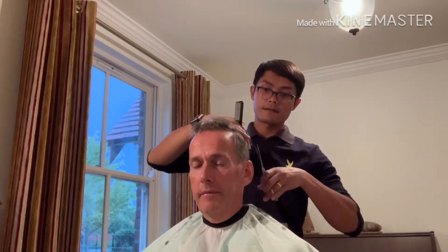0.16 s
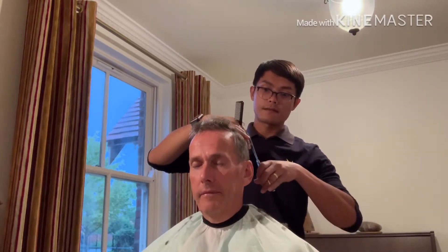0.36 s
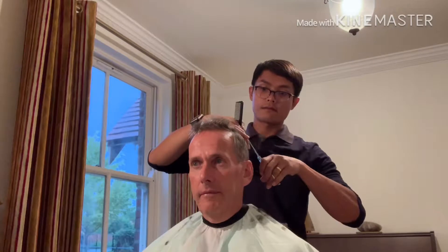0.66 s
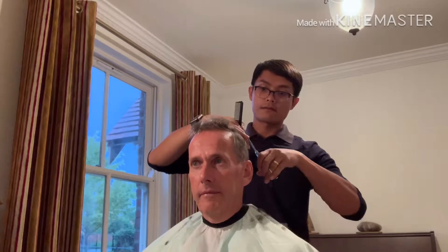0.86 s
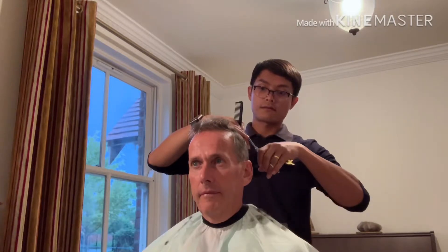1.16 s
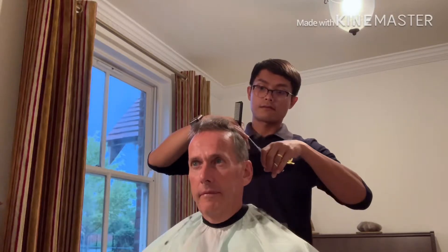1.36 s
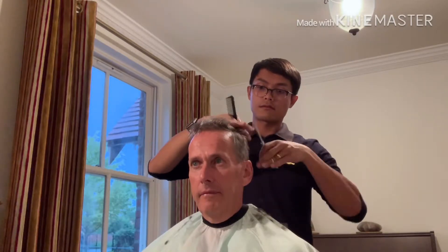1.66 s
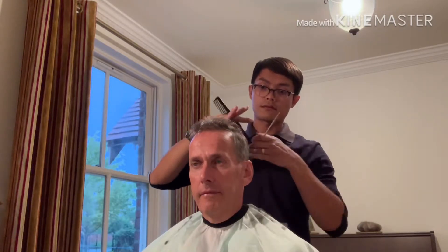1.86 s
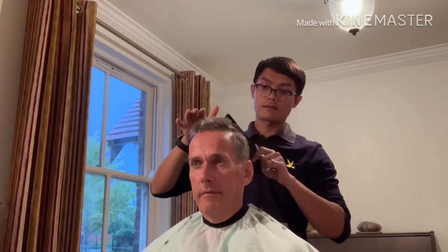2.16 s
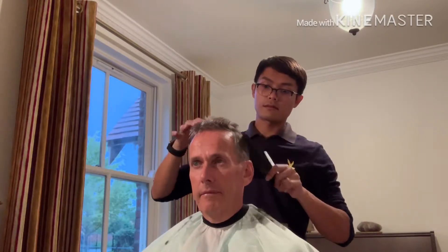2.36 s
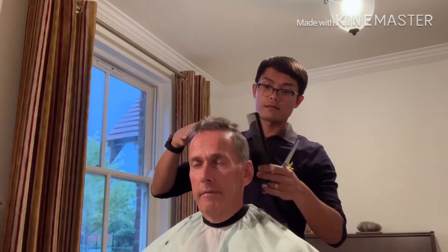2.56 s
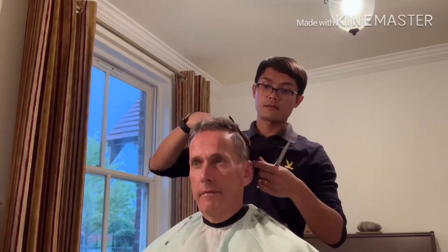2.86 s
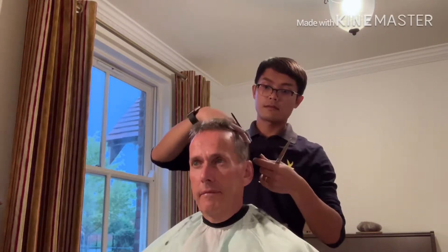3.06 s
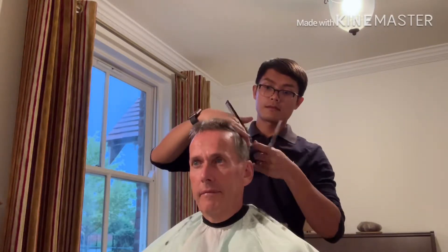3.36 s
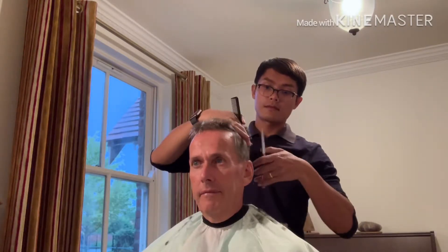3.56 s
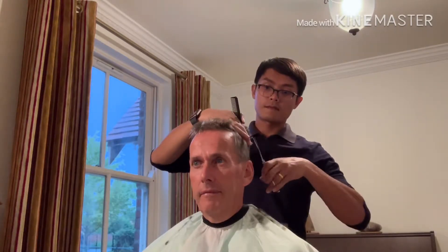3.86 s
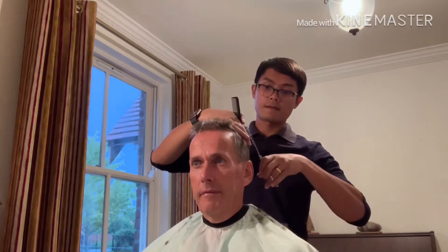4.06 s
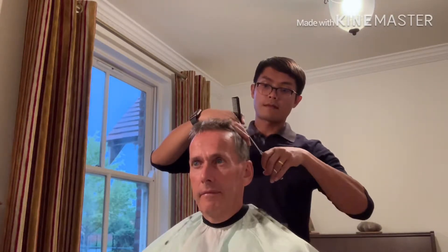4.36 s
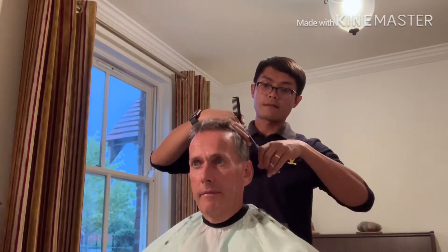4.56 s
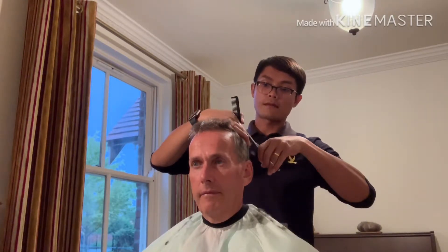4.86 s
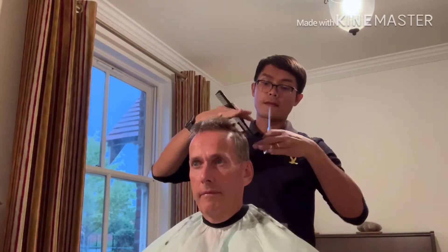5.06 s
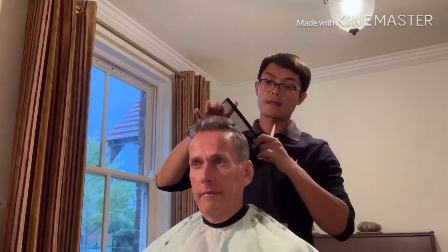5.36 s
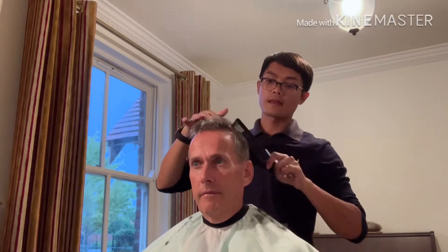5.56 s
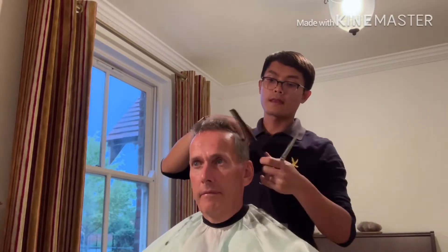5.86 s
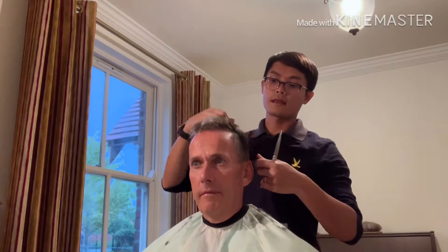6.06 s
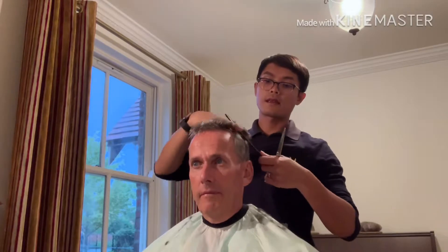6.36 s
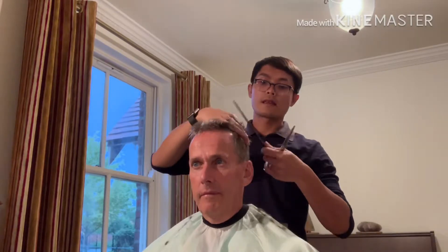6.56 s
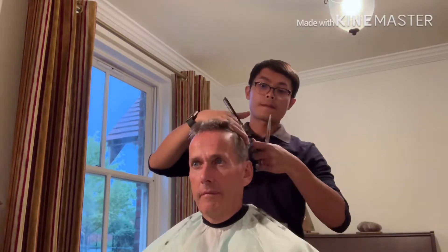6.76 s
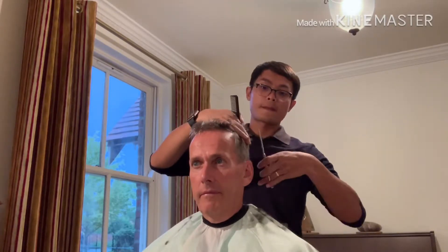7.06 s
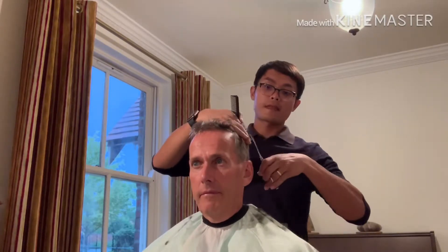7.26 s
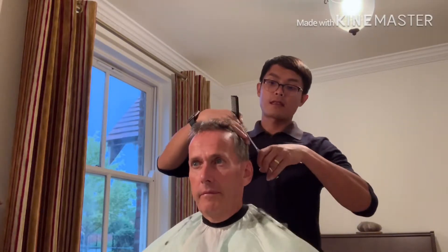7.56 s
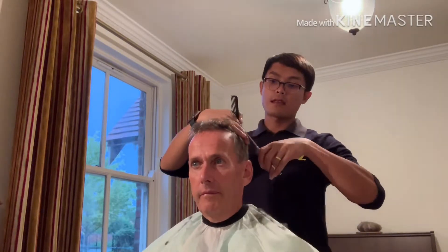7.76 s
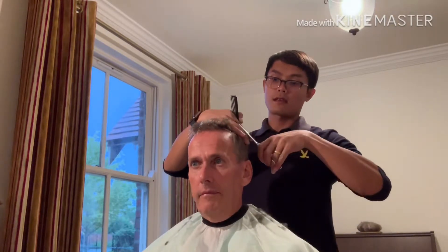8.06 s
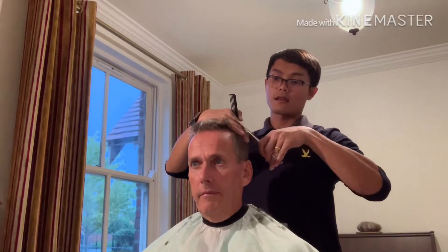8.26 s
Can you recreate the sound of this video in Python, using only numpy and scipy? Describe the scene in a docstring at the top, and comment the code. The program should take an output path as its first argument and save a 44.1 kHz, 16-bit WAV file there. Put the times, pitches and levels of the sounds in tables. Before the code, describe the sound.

A quiet room with short hard reflections, a low steady hum around 50 Hz, soft house rumble and faint hiss throughout. After a tiny tick at 0.1 s, scissors crunch through hair and click shut at about 0.65, 1.0, 1.3 and 1.6 s, thin, crisp and metallic. At 1.95-2.0 s comes a stronger cut with a quick bright double clack of steel and comb. A pause follows with faint ticks and a brief brush near 2.6 s, and a tiny tap at 3.8 s. Snips return at 4.4, 4.5, 4.7 and 4.9 s, then the loudest sharp steel clack at 5.27 s. Quiet ticks at 5.5 s, soft cloth rustle from 6.0 s, and a dull soft footfall on boards at 6.27 s, with fainter shifts at 6.8 and 7.2 s. A light tap at 7.24 s leads to final snips at 7.65, 8.0, 8.15 and 8.27 s.

```python
"""A quiet, hard-walled room: scissors crunch through hair and click shut, comb and steel tap.
Cuts are dense noise snaps, contacts and knocks are bursts through resonances, each with a room tail.
Cloth and comb drag as patchy gliding noise; a foot lands and shifts twice on ringing floor boards.
Mains hum (a wavering sine), house rumble and microphone hiss (shaped noise) lie underneath."""
import sys
import numpy as np
from scipy import signal
from scipy.fft import rfft, irfft, next_fast_len
from scipy.io import wavfile
from scipy.ndimage import uniform_filter1d, map_coordinates

SR = 44100
rng = np.random.default_rng(int(sys.argv[2]) if len(sys.argv) > 2 else 0)


def to_wav(sig):
    """Store sig (one row per channel, or 1-D mono) as 16-bit WAV at the path in sys.argv[1].

    Samples outside -1..1 are clipped; the rate is SR.
    """
    pcm = np.clip(np.atleast_2d(sig), -1, 1) * 32767
    pcm = np.round(pcm).astype(np.int16)
    wavfile.write(sys.argv[1], SR, pcm.T)  # frames by channels


N = 370830  # samples

# blades closing through hair: start_s, growth_s, start_share (0-1), level_db (before tilt and modes),
# best_hz (most excited pitch), tilt_db_per_octave
CUTS = [(0.602, 0.049, 0.4, -76, 11200, -10), (0.643, 0.044, 0.84, -61, 6750, -6),
        (0.662, 0.016, .2, -67, 11200, -1), (0.969, 0.028, 0.57, -61.5, 6750, -6),
        (0.985, 0.014, 0.45, -59.5, 11200, -7.5), (1.307, 0.016, 0.44, -58, 6100, -8),
        (1.603, 0.025, 0.84, -69, 6100, -4.5), (1.769, 0.017, .5, -78, 7900, -1),
        (1.946, 0.04, 1, -53.5, 4400, -2), (1.99, 0.012, .6, -52, 4400, -5),
        (4.339, 0.055, 0.3, -58, 6100, -4.5), (4.366, 0.0087, 0.4, -65, 11200, -6.5),
        (4.694, 0.03, 0.53, -58.5, 6100, -8), (4.707, 0.0081, 0.2, -57.5, 6750, -2),
        (4.918, 0.0333, 0.3, -66.5, 6100, 0), (7.623, 0.018, 0.7, -83, 12900, -1.5),
        (7.64, 0.059, 0.07, -61.5, 6750, -6.5), (7.671, 0.0086, 0.13, -51, 6750, -4.5),
        (7.987, 0.022, 0.5, -62, 6100, -5), (8.007, 0.011, 0.3, -55, 6100, 2.5),
        (8.255, 0.014, 0.03, -56.5, 6100, -0.5)]
# steel and comb contacts: start_s, level_db (before tilt and modes), best_hz, ring_db (relative),
# tilt_db_per_octave, comb_body_db (relative)
TAPS = [(.115, -66.5, 8030, -2, 3, -7), (0.6704, -50.5, 12900, -9, -4, -18),
        (1.001, -51.5, 12900, -3, -3.5, -6), (1.285, -64.5, 8500, -2, -3, -22),
        (1.33, -55, 11200, -4.5, -3, -18), (1.634, -63, 10300, -3, 2.5, 8.5),
        (1.79, -74.5, 5100, 2, 3, -13.5), (1.943, -37.5, 3800, -11, -5, -22),
        (1.989, -38, 12900, -9, -6.5, -13), (2.002, -38.5, 10300, -5.5, 0.5, 5),
        (2.62, -80, 3800, -7, -9, -22), (2.704, -82, 2500, -5, -6, -24), (3.437, -83, 8700, 1, -4, -20),
        (3.825, -69, 7900, 3, 5, -15), (4.381, -53.5, 11200, 3.5, -5.5, -14),
        (4.513, -54.5, 8500, -14, -1.5, -16), (4.721, -48.5, 6750, -3, -1.5, -11),
        (4.854, -57.5, 11200, -10, -4, -25), (4.876, -52.5, 6100, 1.5, 2, -6),
        (4.901, -71, 8500, -7, 1, -11), (4.923, -63, 6100, -11, 3, -11), (4.951, -64.5, 6100, -1, 0, -12),
        (5.269, -28, 6100, -4.5, -0.5, -5), (5.286, -30, 9700, -9.5, -2, -2),
        (5.545, -70, 3800, -8, -7, -22), (7.241, -56.5, 9700, -5, 2, -4), (7.48, -78, 2500, -1, -10.5, -16),
        (7.676, -55, 6750, 0.5, -1.5, -16), (8.012, -52.5, 6750, 0.5, -5.5, -1),
        (8.15, -58.5, 11200, -3.5, -1, -26), (8.266, -54, 9300, 0, -6, -1), (8.281, -64, 6100, 0, 5, -10)]
# dry ticks at the pivot: start_s, dry_peak_db
TICKS = [(1.944, -40), (2.236, -64), (2.62, -63), (4.514, -57), (4.855, -49), (5.546, -63), (5.568, -64),
         (7.478, -65), (8.15, -54)]
# handles meeting: start_s, dry_peak_db, hardness_db_per_octave
KNOCKS = [(0.683, -51.5, -7), (1.008, -54.5, 3.5), (1.341, -56, 1), (1.637, -52, 3), (1.648, -62, 5),
          (1.998, -55, -3.5), (4.407, -55.5, 3), (4.527, -57.5, -4.5), (4.553, -53, -13),
          (4.727, -50.5, -4), (4.922, -54.5, -5.5), (4.951, -57, -4), (5.273, -53, 3), (6.264, -57, 2),
          (7.699, -57.5, 2.5), (8.022, -52, -3.5), (8.167, -52.5, -5.5), (8.279, -51.5, -3)]
# blade modes: mode_hz, level_db (relative), t60_s
STEEL_MODES = [(2500, -9, 0.0084), (2910, 2, 0.0435), (3800, -2.5, 0.081), (5100, -1.5, .09),
               (6100, -10.5, 0.086), (6750, -1, 0.04), (7900, -4.5, 0.061), (8500, 3.5, 0.038),
               (9300, 4, 0.027), (9700, -3.5, 0.056), (10300, -5.5, 0.046), (11200, 0.5, 0.066),
               (13270, -7.5, 0.05), (12900, -4.5, 0.038), (15600, -17.5, 0.036)]
# handle modes: mode_hz, width_hz, level_db (relative)
HANDLE_MODES = [(155, 150, 1), (341.5, 91, 11), (515, 126, 10), (1050, 578, -16.5)]
# spectrum of the scissors' noise: freq_hz, density_db_per_hz (relative)
SNIP_SPECTRUM = [(300, -40.5), (900, -25), (2100, -14), (2600, -9.5), (3300, -7), (3900, -3.5),
                 (4700, -5.5), (6400, 0), (7400, -3.5), (9500, -0.5), (13000, 5.5), (15700, -0.5),
                 (16500, -35)]
# cloth and comb dragging: start_s, swell_s, hold_s, level_db, start_hz, end_hz (loudest pitch)
DRAGS = [(2.609, 0.015, 0, -69, 3500, 3400), (2.69, .02, .02, -92, 1750, 1700),
         (5.983, 0.097, 0, -77.5, 3000, 3340), (6.112, .03, 0.024, -83.5, 1500, 1640),
         (6.247, 0.046, 0.034, -71.5, 1100, 2020), (6.753, 0.06, 0.17, -78, 1300, 1780),
         (7.23, 0.041, 0.015, -68.5, 3300, 2580), (7.465, 0.019, 0.0079, -70, 2500, 3320)]
# spectrum of sliding fibres: freq_hz, density_db_per_hz (relative)
CLOTH_SPECTRUM = [(250, -15), (600, 7.5), (1500, -0.5), (5000, 0), (9000, -4), (15000, -6), (16500, -42)]
# footfalls: start_s, level_db (scales the sum of board modes)
STEPS = [(6.271, -41.5), (6.815, -57), (7.241, -57)]
# floor board modes: mode_hz, level_db (relative), t60_s
BOARD_MODES = [(94, -4, 0.43), (137.9, 0, 0.27), (167.5, 1, 0.26), (195, -7.5, 0.22), (220, -5, 0.36),
               (288, -8.5, 0.11), (306, -18.5, 0.44), (461, -28, 0.26), (774, -23, 0.14)]
# mains hum: time_s, rms_level_db (before waver)
HUM_LEVEL = [(0.0, -51.5), (0.21, -47), (0.98, -49), (1.26, -44.5), (1.52, -50.5), (1.96, -47), (2.08, -49),
             (3.51, -47.5), (3.56, -50), (5.99, -50), (6.16, -55.5), (6.3, -50), (7.0, -51.5), (7.54, -49),
             (7.59, -53.5), (8.22, -46.5), (8.36, -48), (8.41, -51)]
# house rumble: time_s, level_db (rms above 70 Hz, before waver)
RUMBLE_LEVEL = [(0.0, -62.5), (0.7, -66.5), (1.12, -63.5), (3.44, -68.5), (4.94, -64), (5.27, -64.5),
                (6.14, -67.5), (6.44, -65.5), (7.14, -65), (8.41, -65.5)]
# spectrum of the house rumble: freq_hz, density_db_per_hz (relative)
RUMBLE_SPECTRUM = [(12, -43.5), (25, -23.5), (40, -22), (47, -8.5), (55, -9.5), (68, -21), (80, -23.5),
                   (92, -20.5), (108, -30), (136, -16), (165, -29.5), (270, -32.5), (465, -35), (500, -46),
                   (800, -67), (1500, -120)]
# spectrum of the microphone hiss: freq_hz, density_db_per_hz (relative)
HISS_SPECTRUM = [(300, -120), (500, -2.5), (900, -5.5), (1500, -8), (3000, -13), (7000, -15), (12000, -16),
                 (13800, -19.5), (14600, -25.5), (17000, -40)]
# room decay: freq_hz, t60_s
ROOM_DECAY = [(300, 0.24), (2000, 0.21), (5000, 0.28), (11000, 0.19), (16000, 0.15)]
# left-right likeness of noise and room tail: freq_hz, likeness (0-1)
LIKENESS = [(60, 1), (180, 0.94), (550, 0.6), (1650, 0.25), (4970, 0.048), (15000, 0.02)]
# stereo balance: freq_hz, left_over_right_db
BALANCE = [(60, 1.68), (200, 1.5), (380, -2), (1000, 0)]
# right side copied from the left: freq_hz, share (0-1)
COPIED_SHARE = [(4500, .02), (6500, 0.08), (8000, 0.99), (9500, 0.98)]

SPAN = 3 * 2 ** 13  # samples per placed sound
HZ, T = np.fft.rfftfreq(SPAN, 1 / SR), np.arange(SPAN) / SR
MODE_HZ, MODE_DB, MODE_T60_S = np.transpose(STEEL_MODES)
MODE_WIDTH_HZ = np.log(1000) / np.pi / MODE_T60_S
SWELL_DB, FADE_DB_PER_S, NARROW_DB_PER_OCTAVE = 20, 225, 7.5
HUM_HZ, HUM_WAVER_DB, RUMBLE_WAVER_DB = 50.7, 0.43, 2
HISS_DB, HISS_WAVER_DB = -82.5, 0.48
START_HZ, TURN_HZ = 800, 2465  # right side lags one more cycle every TURN_HZ above START_HZ
TOP_HZ = 16500


def cuts(out, colour):
    """Hairs part as dense tiny snaps that grow along the stroke; hair damps the blade modes."""
    for start_s, growth_s, start_share, level_db, best_hz, slope in CUTS:
        snaps = unit(rng.standard_normal(SPAN) * amp(rng.normal(0, 6, SPAN)))
        slips = amp(3.5 * np.repeat(rng.standard_normal(SPAN // 128), 128))
        growth = start_share + (1 - start_share) * np.clip(T / growth_s, 0, 1)
        release = np.clip((1.205 * growth_s - T) / (0.11 * growth_s), 0, 1)
        gripped = 0.47 + resonances(MODE_HZ, 0.05 * MODE_HZ, excited_db(best_hz) - 2)
        sound = amp(level_db) * growth * release * slips * snaps
        add(out, start_s, sound, colour * tilt(slope) * gripped, wet_db=1.5)


def taps(out, colour):
    """A clean blow rings the steel modes, a short noise rattle follows; the comb body resonates too."""
    for start_s, level_db, best_hz, ring_db, slope, body_db in TAPS:
        ring = resonances(MODE_HZ, MODE_WIDTH_HZ, excited_db(best_hz) + ring_db + 27.5)
        blow = 2 * (T == 0) + irfft(ring)
        rattle_envelope = amp(-60 * T / 0.023) * (1 - np.exp(-T / 0.00051))
        rattle = rattle_envelope * rng.standard_normal(SPAN)
        comb = resonances([1050, 1800], [600, 800], [body_db - 13.5, body_db])
        add(out, start_s, amp(level_db) * (rattle + blow), colour * tilt(slope) + comb, wet_db=5)


def ticks(out, colour):
    """An impulse at the pivot rings the lowest steel mode, with a faint broadband click."""
    tick = resonances(MODE_HZ[:1], MODE_WIDTH_HZ[:1], [0]) + amp(-34.5) * colour
    for start_s, peak_db in TICKS:
        add(out, start_s, amp(peak_db) * (T == 0), unit_peak(tick), wet_db=-5)


def knocks(out):
    """An impulse rings the broad handle modes; a harder meeting tilts them brighter."""
    for start_s, peak_db, hardness in KNOCKS:
        knock = resonances(*np.transpose(HANDLE_MODES)) * amp(hardness * np.log2((HZ + 100) / 500))
        add(out, start_s, amp(peak_db) * (T == 0), unit_peak(knock), wet_db=1)


def scissors():
    """Cuts, contacts, pivot ticks and handle knocks share one pair of scissors and one room."""
    out = np.zeros((2, N + SPAN))
    colour = unit(amp(along(SNIP_SPECTRUM, HZ)))
    cuts(out, colour)
    taps(out, colour)
    ticks(out, colour)
    knocks(out)
    return out[:, :N]


def rustle():
    """Fibres slide as crackly, patchy noise; each drag swells, holds and fades around a gliding pitch."""
    crackle_db = 0.45 * wobble(150) + 1.4 * wobble(40)
    hz, t, z = signal.stft(rush(CLOTH_SPECTRUM) * amp(crackle_db), SR, nperseg=256)
    patches = uniform_filter1d(rng.standard_normal(z.shape[1:]), size=2, axis=0)
    patches = unit(uniform_filter1d(patches, size=10, axis=1))
    gain = np.zeros(patches.shape)
    for start_s, swell_s, hold_s, level_db, start_hz, end_hz in DRAGS:
        let_go_s = start_s + swell_s + hold_s
        swell_db = SWELL_DB * np.clip(1 - (t - start_s) / swell_s, 0, None)
        fade_db = FADE_DB_PER_S * np.clip(t - let_go_s, 0, None)
        best_hz = np.interp(t, [start_s, let_go_s + 0.051], [start_hz, end_hz])
        octaves_off = np.abs(np.log2((hz[:, None] + 1) / best_hz))
        band = unit(amp(-NARROW_DB_PER_OCTAVE * octaves_off))
        gain += band * amp(level_db - swell_db - fade_db)
    return signal.istft(z * gain * amp(3.5 * patches), SR, nperseg=256)[1][:, :N]


def footfalls():
    """A soft sole sets decaying floor board modes ringing, with a rounded onset."""
    out = np.zeros(N + SPAN)
    for start_s, level_db in STEPS:
        ring = np.zeros(SPAN)
        for mode_hz, mode_db, t60_s in BOARD_MODES:
            phase = rng.uniform(0, 2 * np.pi)
            ring += amp(mode_db - 60 * T / t60_s) * np.sin(2 * np.pi * mode_hz * T + phase)
        out[round(start_s * SR):][:SPAN] += amp(level_db) * ring * (1 - np.exp(-T / 0.0028))
    return out[:N]


def mains_hum():
    """One sine wavering slightly in level and phase."""
    t = np.arange(N) / SR
    level_db = np.interp(t, *np.transpose(HUM_LEVEL)) + HUM_WAVER_DB * wobble(6)
    return np.sqrt(2) * amp(level_db) * np.sin(2 * np.pi * HUM_HZ * t + 0.22 * wobble(3.7))


def house_rumble():
    """Low shaped noise, levelled by its part above 70 Hz."""
    rumble = rush(RUMBLE_SPECTRUM)
    rumble = rumble / np.std(filtered(rumble, lambda hz: hz > 70))
    level_db = np.interp(np.arange(N) / SR, *np.transpose(RUMBLE_LEVEL))
    return amp(level_db + RUMBLE_WAVER_DB * wobble(8)) * rumble


def microphone_hiss():
    """Steady shaped noise with a slight level waver."""
    return amp(HISS_DB + HISS_WAVER_DB * wobble(2.2)) * rush(HISS_SPECTRUM)


def add(out, start_s, sound, colour, wet_db):
    """Places a coloured sound with its decaying noise tail; the tail's bass is alike on both sides."""
    hz, t, z = signal.stft(rng.standard_normal((2, SPAN // 2)), SR, nperseg=256)
    decay = amp(-60 * t / along(ROOM_DECAY, hz)[:, None])
    tail = signal.istft(z * decay, SR, nperseg=256)[1]
    delayed = np.pad(tail, ((0, 0), (int(0.003 * SR), 0)))
    tail = rfft(delayed, SPAN) / np.linalg.norm(tail[0])
    alike = np.clip(along(LIKENESS, HZ), 0, 1)
    tail[1] = alike * tail[0] + np.sqrt(1 - alike ** 2) * tail[1]
    lead = 256  # samples, room for ringing ahead of the onset
    heard = irfft(rfft(np.roll(sound, lead)) * colour * (1 + amp(wet_db) * tail), SPAN)
    at = round(start_s * SR) - lead
    out[:, at:at + SPAN] += heard


def resonances(hz, width_hz, db):
    """Causal response of a row of damped modes, alternating in sign."""
    sign = (-1) ** np.arange(len(hz))[:, None]
    hz, width_hz, db = (np.reshape(v, (-1, 1)) for v in (hz, width_hz, db))
    damping = 1j * HZ * width_hz
    return np.sum(sign * amp(db) * damping / (hz * hz - HZ * HZ + damping), 0)


def excited_db(best_hz):
    """Steel mode levels, raised near best_hz and scattered at random."""
    boost_db = 14 * np.exp(-(np.log2(MODE_HZ / best_hz) / 0.07) ** 2)
    return MODE_DB + boost_db + rng.normal(0, 3, len(MODE_HZ))


def tilt(db_per_octave):
    """Gain brighter or duller around 5 kHz."""
    return amp(db_per_octave * np.log2(np.clip(HZ, 500, None) / 5000))


def rush(spectrum):
    """Stereo noise of rms 1, alike in the bass."""
    def mid_side(hz):
        turn = np.arccos(np.clip(along(LIKENESS, hz), -1, 1)) / 2
        return amp(along(spectrum, hz)) * [np.cos(turn), np.sin(turn)]
    mid, side = filtered(rng.standard_normal((2, N)), mid_side)
    return unit(np.array([mid + side, mid - side]))


def wobble(rate):
    """A smooth random curve, rate knots a second."""
    knots = rng.standard_normal(int(N * rate / SR) + 4)
    return map_coordinates(knots, [np.arange(N) * rate / SR])


def filtered(x, response):
    """x through a complex response of frequency."""
    m = next_fast_len(N + 8192)
    return irfft(rfft(x, m) * response(np.fft.rfftfreq(m, 1 / SR)), m)[..., :N]


def along(points, hz):
    """Interpolates (Hz, value) points on a log frequency axis."""
    f, v = np.transpose(points)
    return np.interp(np.log(hz + 1), np.log(f + 1), v)


def amp(db):
    """Decibels to amplitude."""
    return 10 ** (np.asarray(db) / 20)


def unit(x):
    """Scales to rms 1."""
    return x / np.sqrt(np.mean(x ** 2) + 1e-20)


def unit_peak(response):
    """Scales a response so that its impulse peaks at 1."""
    return response / np.abs(irfft(response)).max()


def scene():
    """Sums everything that sounds in the room."""
    return scissors() + rustle() + footfalls() + mains_hum() + house_rumble() + microphone_hiss()


def record(dry):
    """The phone takes its treble mostly from one port and turns the right's phase; the bass leans left."""
    left = dry[0]

    def share(hz):
        return np.clip(along(COPIED_SHARE, hz), 0, 1) * (hz > COPIED_SHARE[0][0])

    def lag(hz):
        return np.exp(-2j * np.pi * np.clip(hz - START_HZ, 0, None) / TURN_HZ)

    def balance(hz):
        return amp(np.outer([0.5, -0.5], along(BALANCE, hz))) * (hz < TOP_HZ)

    right = filtered(left, share) + filtered(dry[1], lambda hz: np.sqrt(1 - share(hz) ** 2))
    right = filtered(right, lag)
    return filtered(np.array([left, right]), balance)


dry = scene()
out = record(dry)
to_wav(out)
```